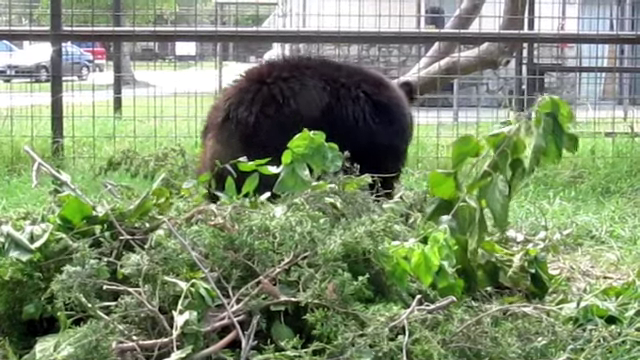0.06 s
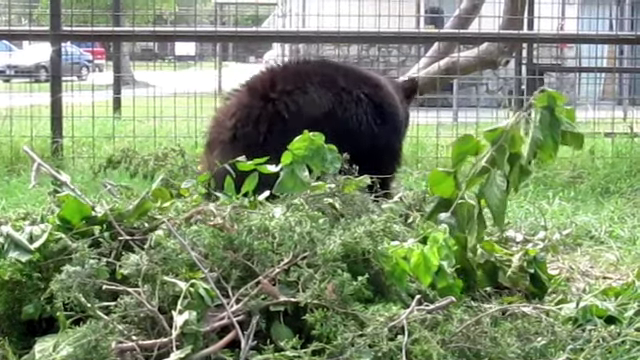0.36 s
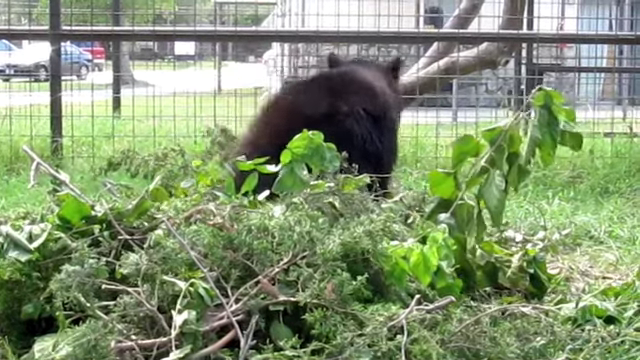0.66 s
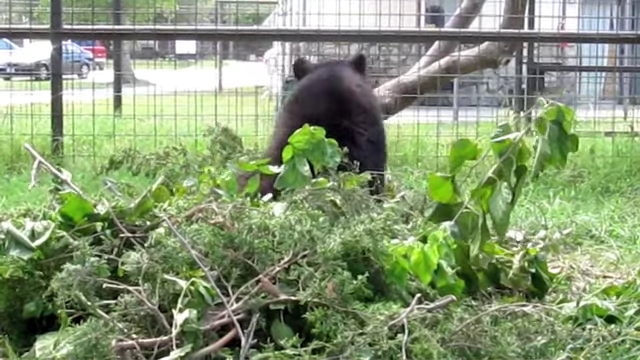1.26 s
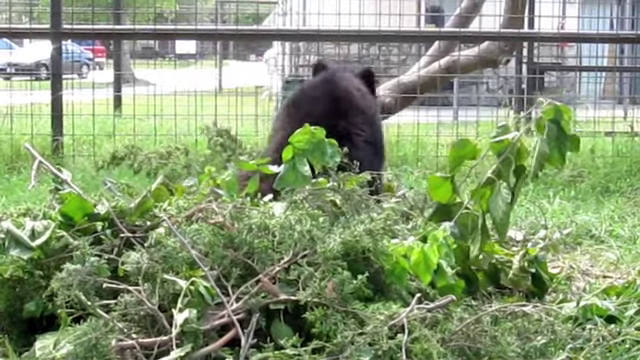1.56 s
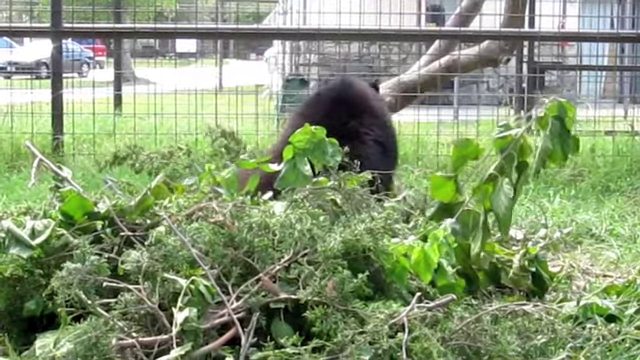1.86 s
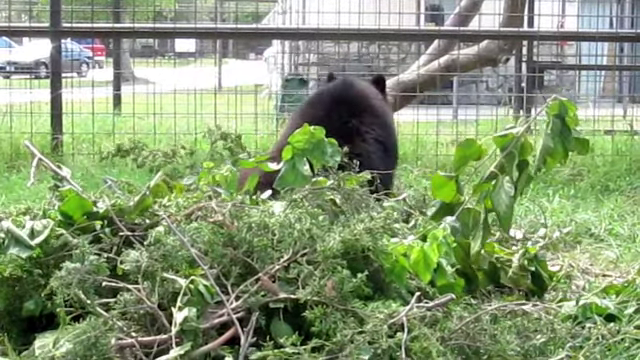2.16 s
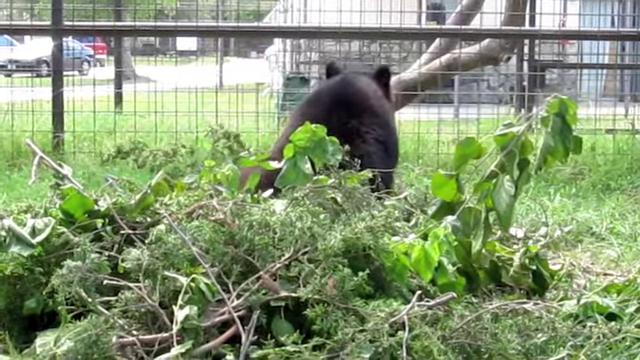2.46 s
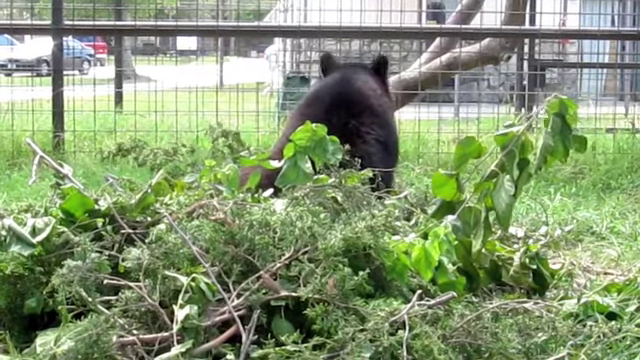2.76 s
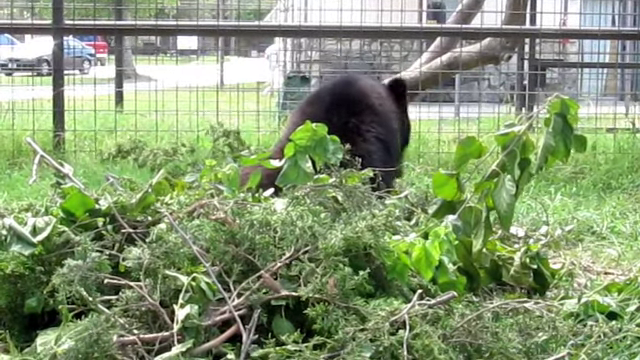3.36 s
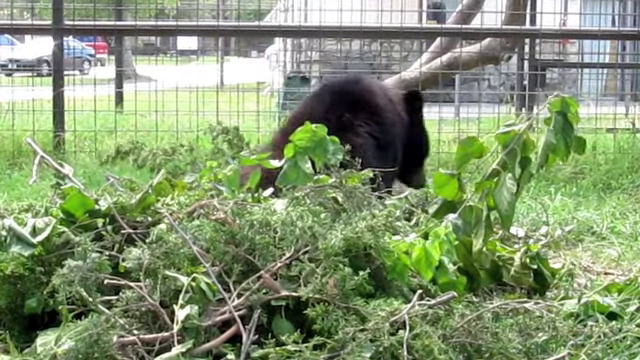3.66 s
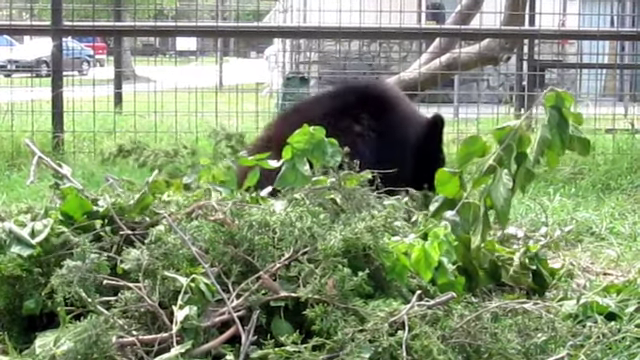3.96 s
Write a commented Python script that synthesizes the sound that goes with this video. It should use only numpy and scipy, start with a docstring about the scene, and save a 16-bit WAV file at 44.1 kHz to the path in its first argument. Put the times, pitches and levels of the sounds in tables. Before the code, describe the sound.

Distant traffic rumbles steadily, with faint leaf rustles and a few short bird chirps.

```python
"""Outdoor enclosure near a road: a bear forages in a heap of cut branches. Mono.
Distant traffic rumbles and hisses, one engine drones and slows, machinery hums with a faint high whine.
Leaves crackle as the branches move. A small bird gives short rising chips that echo off the buildings.
Something rasps once."""
import sys
import numpy as np
from scipy import signal
from scipy.fft import rfft, irfft
from scipy.io import wavfile

SR = 44100
rng = np.random.default_rng(int(sys.argv[2]) if len(sys.argv) > 2 else 0)


def wrap_up_sound(samples):
    """Save the sound to the file named by the first command line argument, as 16-bit audio."""
    columns = np.atleast_2d(samples).T
    # keep every value between -1 and 1, then stretch to whole-number steps
    tamed = np.clip(columns, -1, 1)
    steps = np.round(tamed * 32767).astype(np.int16)
    wavfile.write(sys.argv[1], SR, steps)


N = 176400


def undb(db):
    """Decibels to gain."""
    return 10 ** (np.asarray(db) / 20)


def times():
    """Sample times in s."""
    return np.arange(N) / SR


def curve(rows, column=1):
    """One table column, linearly interpolated in time."""
    rows = np.array(rows)
    return np.interp(times(), rows[:, 0], rows[:, column])


def colour(x, spectrum):
    """Filter x by rows of f/Hz, level/dB; scale to rms 1."""
    hz, db = np.array(spectrum).T
    log_f = np.log(np.maximum(np.arange(N // 2 + 1) * SR / N, 1))
    y = irfft(rfft(x) * undb(np.interp(log_f, np.log(hz), db)), N)
    return y / y.std()


def noise(spectrum):
    """Coloured noise, rms 1."""
    return colour(rng.standard_normal(N), spectrum)


def walk(cutoff_hz):
    """Smooth random wander, rms 1."""
    hz = np.arange(N // 2 + 1) * SR / N
    y = irfft(rfft(rng.standard_normal(N)) * np.exp(-(hz / cutoff_hz) ** 2) * (hz > 0), N)
    return y / y.std()


def phase_rad(hz):
    """Phase of a moving frequency, random start."""
    return 2 * np.pi * (np.cumsum(hz) / SR + rng.random())


def yard_echo(x, t60_s=0.44):
    """Diffuse echo from trees and walls."""
    tail = rng.standard_normal(N) * np.exp(-np.log(1000) * times() / t60_s)
    return signal.fftconvolve(x, tail / np.sqrt(np.sum(tail ** 2)))[:N]


def traffic():
    """Steady distant wash; tyre hiss and exhaust roar swell as cars pass."""
    # f/Hz, relative density/dB
    wash_spectrum = [(12, -43), (20, -10.5), (69, -4.5), (104, 2), (133, -3.5), (166, -7), (241, -7.5),
                     (342, -14), (397, -13.5), (497, -18.5), (705, -13.5), (759, -14.5), (839, -12.5),
                     (1190, -17), (1530, -20), (2450, -23.5), (2910, -20), (4340, -27), (7700, -32),
                     (10000, -80.5), (16900, -120)]
    tyre_spectrum = [(300, -17), (600, -7.5), (850, 0.5), (1150, 7.5), (1500, -13), (3000, -35)]
    roar_spectrum = [(90, -11.5), (170, -0.5), (260, 2.5), (340, -1), (600, -6.5), (1200, -35.5)]
    # t/s, level/dB
    tyre_levels = [(0, -54.5), (.7, -53.5), (1.4, -46), (1.9, -54), (2.3, -49), (2.8, -44.5), (3.1, -46),
                   (3.3, -51.5), (4, -49.5)]
    roar_levels = [(0, -73), (.9, -53.5), (1.6, -47), (2.4, -47.5), (2.8, -51.5), (4, -54)]
    wash = undb(-37.5 + 0.1 * walk(15)) * noise(wash_spectrum)
    tyres = undb(curve(tyre_levels)) * noise(tyre_spectrum)
    roar = undb(curve(roar_levels)) * noise(roar_spectrum)
    return wash + tyres + roar


def engine(jitter=0.0047):
    """Far exhaust note and its octave, sinking as the vehicle slows."""
    # t/s, firing rate/Hz, fundamental level/dB, octave level/dB
    exhaust = [(0, 105, -44, -54), (.06, 105.6, -36, -54), (.27, 103.8, -45.5, -50.5), (.48, 104, -36, -51),
               (.55, 104, -42, -52.5), (.65, 104.5, -35, -45), (.75, 103.8, -42, -53),
               (.84, 102.7, -32.5, -46.5), (1.06, 101.6, -49.5, -46.5), (1.15, 100.1, -39, -50),
               (1.35, 95.3, -47, -46.5), (1.65, 91.5, -45, -44.5), (2.2, 90, -48, -49),
               (2.6, 86, -44.5, -51), (4, 82, -52.5, -61)]
    firing_rad = phase_rad(curve(exhaust) * (1 + jitter * walk(10)))
    fundamental = undb(curve(exhaust, column=2)) * np.sin(firing_rad)
    octave = undb(curve(exhaust, column=3)) * np.sin(2 * firing_rad)
    return np.sqrt(2) * (fundamental + octave)


def machinery(waver_db=1.95, drift=0.00042):
    """Steady hum and whine, wavering on their way through the air."""
    # f/Hz, level/dB
    tones = [(57.5, -50), (160, -50), (235, -55), (266, -60), (385, -63), (409, -56), (1518, -70.5),
             (1986, -67), (2218, -67), (2686, -71), (2803, -66), (4904, -66.5), (5081, -66), (5196, -72)]
    hum = np.zeros(N)
    for hz, db in tones:
        gain = undb(db + waver_db * walk(4))
        hum += gain * np.sin(phase_rad(hz * (1 + drift * walk(4.4))))
    return np.sqrt(2) * hum


def fan(pitch_hz=769.6, waver_db=3, drift=0.003):
    """One fan tone that swells and wavers."""
    # t/s, level/dB
    levels = [(0, -59), (.5, -65), (1.4, -62), (1.9, -49), (2.6, -56.5), (3.1, -50), (3.6, -57.5), (4, -61)]
    gain = undb(curve(levels) + waver_db * walk(12))
    return np.sqrt(2) * gain * np.sin(phase_rad(pitch_hz * (1 + drift * walk(18))))


def leaves(crackles_per_s=7000, spread_db=2):
    """Dense tiny crackles, swelling whenever the branches move."""
    # peak t/s, rise and fall time constant/s, relative level/dB
    rustles = [(.05, .04, -48.5), (.45, 0.047, -53), (.64, 0.051, -51), (.9, 0.052, -53.5),
               (1.16, 0.05, -52.5), (1.43, .012, -49), (1.495, .05, -46), (1.94, 0.029, -50),
               (2.03, 0.05, -47), (3.14, .012, -56), (3.95, 0.04, -48)]
    # f/Hz, relative density/dB
    crackle_spectrum = [(800, -14), (2000, -5.5), (3300, 0.5), (5000, -0.5), (7800, -3)]
    clicks = (rng.random(N) < crackles_per_s / SR) * rng.standard_normal(N)
    clicks *= undb(spread_db * np.minimum(rng.exponential(size=N), 4))
    motion = sum(undb(db) * np.exp(-np.abs(times() - peak_s) / tau_s) for peak_s, tau_s, db in rustles)
    return 2 * motion * colour(clicks, crackle_spectrum)


def bird(chip_s=0.014, rise_hz_per_s=225000):
    """Very fast upward whistles, each followed by its echo."""
    # start t/s, start f/Hz, level/dB
    chips = [(.342, 5530, -38), (0.396, 5360, -46), (1.476, 5800, -41.5), (1.529, 5450, -43),
             (2.022, 6340, -44.5), (3.027, 5740, -40.5), (3.93, 6476, -40.5)]
    whistles = np.zeros(N)
    for start_s, hz, db in chips:
        age_s = np.clip(times() - start_s, 0, chip_s)
        envelope = undb(db) * np.sin(np.pi * age_s / chip_s) ** 2
        whistles += envelope * np.sin(phase_rad(hz + rise_hz_per_s * age_s))
    return np.sqrt(2) * whistles + undb(4) * yard_echo(whistles)


def rasp(peak_s=2.811, sigma_s=0.019, level_db=-38, echo_db=-6):
    """One brief scratchy noise burst with a little echo."""
    # f/Hz, relative density/dB
    spectrum = [(600, -5), (1300, -3), (2000, -1.5), (2700, 2.5), (3900, -2.5), (4800, -18), (7500, -27)]
    envelope = undb(level_db) * np.exp(-((times() - peak_s) / sigma_s) ** 2 / 2)
    burst = envelope * noise(spectrum)
    return burst + undb(echo_db) * yard_echo(burst)


def scene():
    """All sources, identical in both channels."""
    mono = traffic() + engine() + machinery() + fan() + leaves() + bird() + rasp()
    return np.array([mono, mono])


def record(dry):
    """Steep elliptic low-pass."""
    cutoff_hz = 7780
    return signal.sosfilt(signal.ellip(14, .1, 80, cutoff_hz, fs=SR, output="sos"), dry)


dry = scene()
out = record(dry)
wrap_up_sound(out)
```